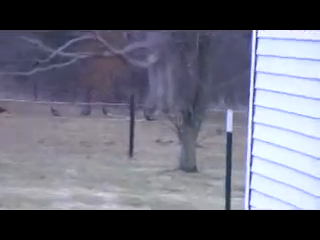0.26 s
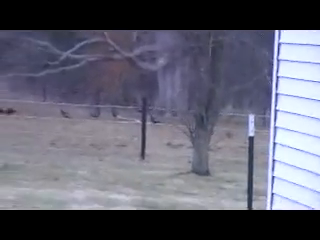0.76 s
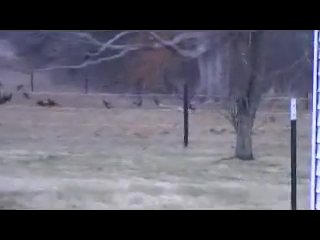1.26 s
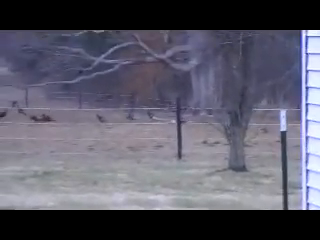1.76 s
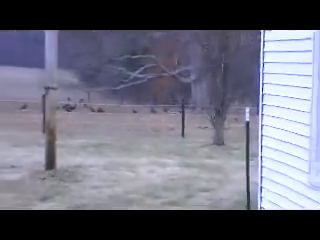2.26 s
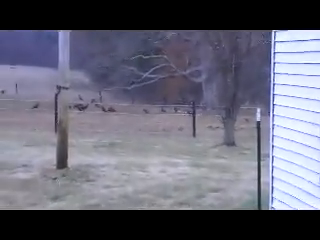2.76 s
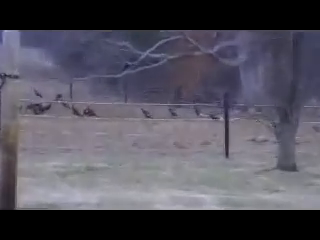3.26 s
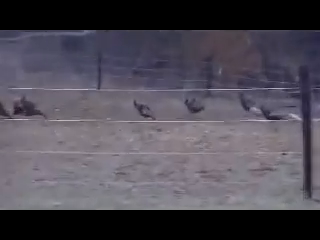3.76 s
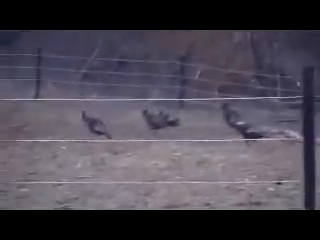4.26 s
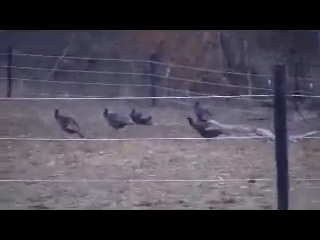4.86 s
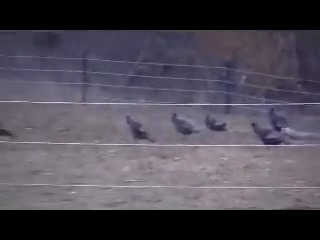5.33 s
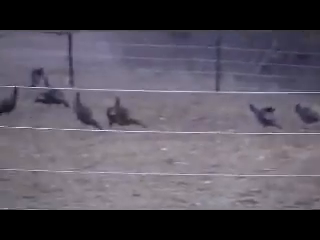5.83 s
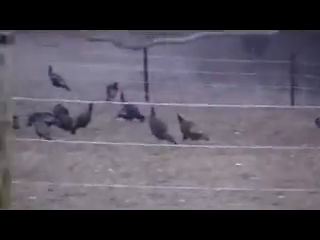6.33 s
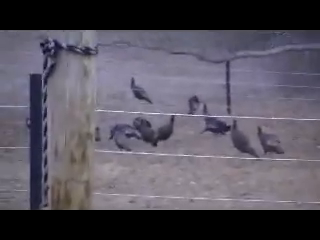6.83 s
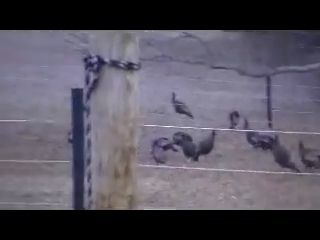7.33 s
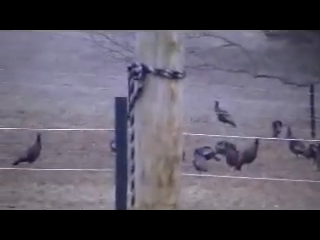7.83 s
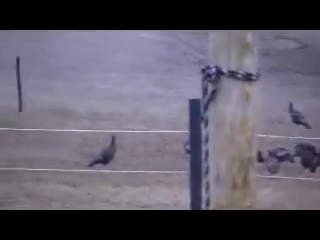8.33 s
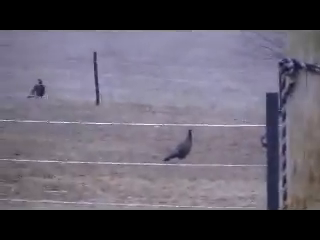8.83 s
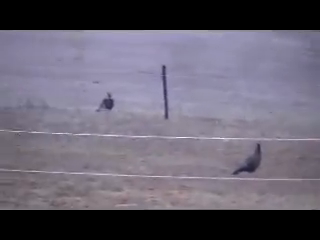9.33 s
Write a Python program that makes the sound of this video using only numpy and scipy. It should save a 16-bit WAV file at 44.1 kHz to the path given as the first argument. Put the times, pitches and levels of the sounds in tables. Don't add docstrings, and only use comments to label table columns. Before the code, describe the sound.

Outdoors at a field edge, a handheld camera is rubbed and knocked, a loose part chattering briefly. Short whistled turkey notes begin, then four spaced hoarse yelps opened by falling chirps. Tiny zoom ticks and a sharp click follow, then several birds yelp and whistle over each other. Finally a farther bird yelps steadily. Hiss, thin whine and distant machine hum lie underneath, the casing noises very close to the microphone.

```python
import sys
import numpy as np
from scipy import signal
from scipy.fft import rfft, irfft, next_fast_len
from scipy.io import wavfile
from scipy.ndimage import uniform_filter1d, map_coordinates

SR = 44100
rng = np.random.default_rng(int(sys.argv[2]) if len(sys.argv) > 2 else 0)


def unload_wav(signal):
    wavfile.write(
        sys.argv[1],
        SR,
        np.round(np.clip(np.atleast_2d(signal).T, -1, 1) * 32767).astype(np.int16),
    )


def boost_factor(decibels):
    exponent = np.asarray(decibels, float) / 20
    return 10 ** exponent


N = 422919
ONSET_S = 0.005


def unit(x):
    return x / np.sqrt(np.mean(x ** 2) + 1e-20)


def along(points, hz):
    f, v = np.transpose(points)
    return np.interp(np.log(hz + 1), np.log(f + 1), v)


def curves(rows, t):
    s, *cols = np.transpose(rows)
    return [np.interp(t, s, c) for c in cols]


def wobble(rate, size=N):
    knots = rng.standard_normal(int(size * rate / SR) + 4)
    return map_coordinates(knots, [np.arange(size) * rate / SR])


def filtered(x, response):
    m = next_fast_len(x.shape[-1] + 8192)
    return irfft(rfft(x, m) * response(np.fft.rfftfreq(m, 1 / SR)), m)[..., :x.shape[-1]]


def modes(table):
    return lambda f: sum((-1) ** k * boost_factor(db) * 1j * f * w / (c * c - f * f + 1j * f * w)
                         for k, (c, w, db) in enumerate(table))


def span(start, length, release=ONSET_S):
    i = np.arange(round(start * SR), round((start + length) * SR))
    edges = np.minimum((i - i[0]) / ONSET_S, (i[-1] - i) / release) / SR
    return i, (i - i[0]) / len(i), np.clip(edges, 0, 1)


def swells(rows, edge):
    t = np.arange(N) / SR
    return sum(boost_factor(db) * np.clip(np.minimum(t - s, s + length - t) / (edge * length), 0, 1)
               for s, length, db in rows)


def flock():
    # start t/s, length t/s, first f/Hz, last f/Hz, level/dB
    settling = [
        (1.635, 0.061, 1510, 1346, -41.5),
        (5.772, 0.052, 1420, 1290, -32.5),
        (6.777, 0.035, 1580, 1220, -33.5),
        (7.585, 0.067, 1480, 1320, -43),
        (7.75, 0.042, 1630, 1286, -43),
    ]
    steady = [(1.318, 0.045, 1374, 1360, -56.5), (5.762, .02, 1506, 1416, -42),
              (1.75, 0.044, 1352, 1355, -50.5), (4.52, .018, 1270, 1230, -51.5),
              (4.535, .025, 1410, 1410, -58), (5.605, 0.02, 1080, 1190, -51),
              (5.622, 0.023, 1300, 1430, -51), (7.648, .016, 1500, 1720, -56),
              (5.285, .014, 1130, 1030, -47), (6.42, 0.016, 1270, 1268, -41.5),
              (6.43, 0.044, 1407, 1440, -50), (6.448, 0.025, 1265, 1270, -45.5),
              (6.828, 0.034, 1236, 1270, -44), (7.792, 0.042, 1437, 1470, -49),
              (7.92, 0.014, 1450, 1450, -51), (7.935, 0.018, 1330, 1330, -55),
              (7.972, 0.02, 1616, 1560, -52.5)]
    long_rise = [
        (5.805, 0.142, 1277, 1357, -38.5),
    ]
    pips = [(1.413, .055, 2132, 2204, -55.5), (1.69, .014, 1330, 1130, -54), (1.742, .012, 1180, 1350, -55),
            (2.102, .02, 2300, 2500, -59), (1.478, .016, 1520, 1480, -57), (1.62, .018, 1920, 1850, -54),
            (1.975, 0.02, 1800, 1800, -50), (2.008, .015, 1510, 1500, -41), (4.492, .022, 1500, 1500, -52),
            (5.607, 0.016, 2150, 2260, -54), (5.648, 0.018, 1700, 1720, -61),
            (5.745, 0.02, 1800, 1730, -49), (5.82, 0.089, 2300, 2320, -58.5),
            (6.082, 0.032, 1900, 1920, -49.5), (6.089, 0.028, 950, 980, -43.5),
            (6.245, .017, 1380, 1370, -47.5), (6.405, 0.037, 936.4, 1010, -44.5),
            (7.75, 0.056, 2190, 1830, -54.5)]
    husky = [
        (4.863, 0.04, 1350, 1330, -39.5),
        (5.179, 0.039, 1600, 1300, -38),
        (5.435, 0.05, 1500, 1290, -49),
        (5.47, 0.049, 1430, 1300, -38),
        (5.515, 0.081, 1250, 1180, -42.5),
        (6.113, 0.043, 1300, 1250, -33),
        (6.102, 0.014, 1700, 1400, -48),
        (5.55, .055, 1020, 1000, -46),
        (7.6, .025, 1080, 950, -46),
        (6.152, 0.057, 1290, 1360, -44),
    ]
    squeaks = [(1.331, .041, 2690, 2610, -65), (1.375, .034, 2480, 2250, -62),
               (5.501, .046, 2440, 2500, -59), (6.106, .025, 2410, 2290, -55),
               (6.111, .033, 2670, 2520, -54), (6.151, .061, 2470, 2510, -58),
               (7.755, .027, 2960, 2840, -68), (5.478, .014, 2780, 2720, -61),
               (6.415, .03, 4220, 4120, -67), (6.41, .025, 1900, 1950, -55), (7.24, .022, 2200, 2000, -59),
               (6.1, .05, 4000, 4200, -69), (5.78, .025, 4150, 4050, -65), (7.092, .012, 2330, 2250, -50)]
    middle = [
        (1.375, 0.037, 1140, 1100, -60),
        (1.413, 0.059, 1067, 1090, -55),
        (1.7, 0.052, 1114, 1170, -51.5),
    ]
    split = [
        (4.55, .103, 1180, 1110, -51),
        (5.21, 0.071, 1160, 1260, -46.5),
    ]
    low = [
        (2.007, .1, 925, 1020, -47.5),
    ]
    low_husky = [
        (5.547, 0.063, 939, 1025, -50),
        (6.145, 0.098, 935, 1034, -45.5),
    ]
    # multiple of the pitch, level/dB at the start, level/dB at the end
    swelling = [(1, -8, -1), (2, -30, -33)]
    plain = [(1, 3.5, 3), (2, -23, -26)]
    mellowing = [(1, -9, -7), (2, -17, -27)]
    thin = [(0.99, 0, -4)]
    waning = [(1, -2, -4.5), (2, -30, -29)]
    reedy = [(1, -1, -2), (2, -9, -12), (3, -27, -30)]
    halving = [(1, -3, 2), (3 / 2, -2, -18), (2, -13, -26)]
    rich = [(1, -6, -8), (2, 1, -2), (3, -13, -15), (4, -16, -27)]
    muffled = [(1, -3, -6), (2, 0, -1), (3, -10, -15), (4, -20, -29)]
    clear = whistles(settling, swelling, bend=-4.5, flutter_db=2.0, waver=0.004)
    clear += whistles(steady, plain, bend=0.3, flutter_db=-1.5, waver=0.0021)
    clear += whistles(long_rise, mellowing, bend=0.42, flutter_db=0.5, waver=0.0026)
    clear += whistles(pips, thin, bend=-0.3, flutter_db=2.5, waver=0.0047)
    clear += whistles(husky, waning, bend=-1.02, flutter_db=1.5, waver=0.032)
    clear += whistles(squeaks, thin, bend=0.3, flutter_db=5, waver=0.04)
    clear += whistles(middle, reedy, bend=2.5, flutter_db=1.5, waver=0.0044)
    clear += whistles(split, halving, bend=1.5, flutter_db=1.5, waver=0.005)
    clear += whistles(low, rich, bend=2.8, flutter_db=1.5, waver=0.007)
    clear += whistles(low_husky, muffled, bend=2.8, flutter_db=2.0, waver=0.016)

    # start t/s, length t/s, level/dB, upper throat relative level/dB
    near = [
        (2.358, 0.1, -40.5, -17),
        (2.708, 0.093, -40.5, -16),
        (3.07, 0.098, -40.5, -15),
        (3.403, 0.098, -43, -25),
        (6.485, .1, -40, -16),
    ]
    rough = [
        (6.805, 0.095, -39.5, -14),
        (7.097, 0.1, -38, -8),
    ]
    under = [
        (4.865, 0.13, -53.5, -9.5),
        (5.18, 0.041, -49.5, -10),
        (5.28, 0.044, -51.5, -30),
        (5.475, .14, -47, -13),
        (5.776, 0.12, -46, -14),
        (6.1, 0.062, -45.5, -15),
        (6.145, 0.088, -48, -9),
        (6.412, 0.069, -47, -14.5),
        (6.785, 0.034, -50, -12),
    ]
    far = [
        (7.235, .1, -50.5, -16),
        (7.572, 0.097, -49.5, -20),
        (7.925, 0.072, -51, -17),
        (8.305, .095, -49, -17),
        (8.68, 0.1, -49.5, -16),
        (9.045, 0.098, -49, -19),
        (9.41, 0.1, -48.5, -16),
    ]
    # f/Hz, width f/Hz, level/dB
    throat = [(835, 270, -3), (1190, 300, 1.5), (1500, 294, 6.5), (1800, 220, 3.5), (2120, 330, -6)]
    rough_throat = [(925, 200, -4), (1160, 290, 1), (1400, 280, 3.5), (1670, 240, 2), (2190, 400, -9)]
    low_throat = [(935, 560, -2.5), (1260, 505, 5), (1580, 405, 2)]
    far_throat = [(1480, 250, 12.3), (2150, 440, 6), (2600, 310, 2.9)]
    hoarse = rasps(near, throat, pulse_hz=298, jitter=0.025, breathy=0.27)
    hoarse += rasps(rough, rough_throat, pulse_hz=283.3, jitter=0.03, breathy=0.61)
    hoarse += boost_factor(4.0) * rasps(under, low_throat, pulse_hz=313.4, jitter=0.06, breathy=0.99)
    hoarse += rasps(far, far_throat, pulse_hz=302.0, jitter=0.0492, breathy=0.68, upper_hz=2840)
    return clear + chirps() + hoarse


def whistles(notes, partials, bend, flutter_db, waver):
    out = np.zeros(N)
    for s, length, first_hz, last_hz, db in notes:
        i, u, gate = span(s, length)
        hz = first_hz + (last_hz - first_hz) * np.expm1(bend * u) / np.expm1(bend)
        phase = 2 * np.pi * np.cumsum(hz * (1 + waver * wobble(146.5, size=len(i)))) / SR
        for k, first_db, last_db in partials:
            flutter = flutter_db * wobble(107.5, size=len(i))
            level_db = db + first_db + (last_db - first_db) * u + flutter
            out[i] += gate * np.sqrt(2) * boost_factor(level_db) * np.sin(k * phase)
    return out


def chirps():
    # t/s, peak level/dB, length t/s
    falls = [
        (1.993, -39, 0.017),
        (2.348, -38, 0.016),
        (2.692, -37, 0.021),
        (3.058, -36.5, 0.013),
        (3.392, -37.5, 0.018),
        (6.4715, -34.5, 0.018),
        (7.085, -35, 0.017),
    ]
    overtone_db = -19
    out = np.zeros(N)
    for s, db, length in falls:
        u = np.arange(int(length * SR)) / (length * SR)
        phase = 2 * np.pi * np.cumsum(1500 - 480 * u ** 1.35) / SR
        envelope = np.sin(np.pi * u ** 1.16) ** 0.29
        tone = np.sin(phase) + boost_factor(overtone_db) * u * np.sin(2 * phase)
        out[round(s * SR):][:len(u)] += boost_factor(db) * envelope * tone
    return out


def rasps(calls, throat, pulse_hz, jitter, breathy, upper_hz=4400):
    # f/Hz, width f/Hz, level/dB
    upper_throat = [(2500, 420, 3), (3470, 630, -2.5), (4050, 460, -6)]
    release_s, sag_db = 0.016, -4
    dulling_db, dulling_s = -7, 0.021
    lumps_db, lumps_per_s = 1.1, 90
    neck_shift = 0.07
    out = np.zeros(N)
    for s, length, db, upper_db in calls:
        i, u, gate = span(s, length, release_s)
        unsteady = jitter * wobble(120, size=len(i)) + 0.03 * wobble(8, size=len(i))
        cycle = np.cumsum(pulse_hz * (1 + unsteady)) / SR
        pulses = np.diff(np.floor(cycle), prepend=0) * boost_factor(1.34 * wobble(263, size=len(i)))
        puffs = rng.standard_normal(len(i)) * np.exp(-1.5 * (cycle % 1))
        source = np.sqrt(1 - breathy) * unit(pulses) + np.sqrt(breathy) * unit(puffs)

        turns = np.cumsum(rng.random(size=100))

        def path(f):
            delays = np.exp(-4j * np.interp(f / 220, range(len(turns)), turns))
            return delays / (1 - 1j * 700 / (f + 1)) ** 3

        def upper_response(f):
            low_cut = (1 - 1j * 1900 / (f + 1)) ** 3
            return path(f) * modes(upper_throat)(f) / low_cut / np.sqrt(1 + (f / upper_hz) ** 10)

        ends = [filtered(source, lambda f: path(f) * modes(throat)(f * k) / (1 + 1j * f / 2200) ** 3)
                for k in 1 + neck_shift * rng.uniform(-1.04, 1, size=2)]
        lower = unit((1 - u) * ends[0] + u * ends[1])
        upper = unit(filtered(source, upper_response))
        level_db = db + sag_db * u + lumps_db * wobble(lumps_per_s, size=len(i))
        dulling = dulling_db * (1 - np.exp(-u * length / dulling_s))
        upper_level_db = upper_db + lumps_db * wobble(lumps_per_s, size=len(i)) + dulling
        out[i] += gate * boost_factor(level_db) * (lower + boost_factor(upper_level_db) * upper)
    return out


def echo(x):
    # f/Hz, time to fall 60 dB t/s
    field = [(500, 0.35), (1500, 0.73), (5000, 0.34)]
    hz, t, z = signal.stft(rng.standard_normal((2, SR // 2)), SR, nperseg=256)
    decay = boost_factor(-60 * t / along(field, hz)[:, None])
    tail = signal.istft(z * decay, SR, nperseg=256)[1]
    return signal.fftconvolve(x[None], tail / np.linalg.norm(tail[0]), axes=1)[:, :N]


def camera():
    return hiss() + whine() + rub() + knock() + clicks() + zoom()


def rub():
    # start t/s, length t/s, level/dB
    strokes = [
        (-.05, 0.2, -66),
        (.33, 0.34, -59.5),
        (.722, 0.057, -48.5),
        (.77, 0.099, -52.5),
        (9.02, 0.17, -67),
    ]
    # f/Hz, density level/dB
    skin = [(800, -60), (1500, -2), (3000, 6.5), (5000, 0), (9000, -2), (11000, -7), (12500, -22)]
    grain = rng.standard_normal(N) * boost_factor(1.3 * wobble(200) + 0.88 * wobble(68.3))
    return swells(strokes, edge=0.33) * unit(filtered(grain, lambda f: boost_factor(along(skin, f))))


def knock():
    # t/s, peak level/dB, thump relative level/dB
    blows = [
        (.003, -38, 7.5),
        (0.726, -35, 3),
        (0.7286, -27, 4),
        (.7335, -25.5, -9),
        (0.738, -22, -8),
        (0.745, -39, 1),
        (0.75, -39, -8),
        (0.756, -40, 2),
    ]
    # f/Hz, width f/Hz, level/dB
    casing = [(606, 330, -1.5), (796, 260, 3), (1170, 83, 7.5), (1700, 170, 4), (2300, 500, -7.5),
              (2840, 440, -9.5), (4700, 630, -15.5), (6000, 390, -11)]
    thump = [(208, 104, 2.5), (456, 94, -0.5)]
    # starts 0.7775 s, every 7.5 ms, 1 dB weaker each time
    rattle = [(0.7775 + k * 0.0075, -40.5 - k, 5.5) for k in range(8)]
    s, db, low_db = np.transpose(blows + rattle)
    ring = boost_factor(11.0) * bursts(s, db, t60=0.028, snap=5.2, response=modes(casing))
    return ring + boost_factor(13.0) * bursts(s, db + low_db, t60=0.049, response=modes(thump))


def clicks():
    # t/s, peak level/dB, lower part relative level/dB
    snaps = [(0.0687, -43, -8), (0.4474, -42, -9), (0.8165, -43, 9), (0.8374, -51, 6), (1.755, -50, 3),
             (4.2073, -54, -4), (4.706, -34.5, -12), (4.7142, -53, -6), (4.7495, -47, -10),
             (4.7533, -56, -8), (4.8226, -54, 10), (4.8256, -51.5, 14.5), (4.934, -64, 14),
             (8.7894, -55, 3)]

    def bright(f):
        return modes([(7500, 3500, 0), (10200, 3000, -4)])(f) ** 2 / (1 + 1j * (f / 12000) ** 9)

    def lower(f):
        return modes([(2600, 2600, -3)])(f) / (1 + 1j * (f / 10500) ** 7)

    s, db, low_db = np.transpose(snaps)
    out = boost_factor(5.0) * bursts(s, db, t60=0.004, snap=4.5, response=bright)
    return out + boost_factor(7.0) * bursts(s, db + low_db, t60=0.004, snap=4.5, response=lower)


def zoom():
    # t/s, peak level/dB
    ticks = [(3.0341, -54), (3.0864, -55), (3.3094, -57), (3.3995, -55), (3.4875, -55), (3.5853, -55),
             (3.6282, -54), (3.7249, -54), (3.773, -51), (3.8344, -52), (3.8794, -54), (4.0407, -53),
             (4.0594, -65)]
    # f/Hz, width f/Hz, level/dB
    gear = [(3430, 220, 6.5), (5950, 430, 2), (9150, 2500, -4)]
    return boost_factor(2.0) * bursts(*np.transpose(ticks), t60=0.07, response=modes(gear))


def bursts(times, levels_db, t60, response, snap=1.01):
    x, t = np.zeros(N), np.arange(SR // 20) / SR
    for s, db in zip(times, levels_db):
        noise = rng.standard_normal(len(t))
        noise[0] = -snap
        x[round(s * SR):][:len(t)] += boost_factor(db - 60 * t / t60) * noise
    return filtered(x, response)


def whine():
    # f/Hz, level/dB
    tones = [(2186, -68), (4371, -84), (5959, -84), (6331, -88), (6557, -82), (8742, -91), (10971, -96)]
    t = np.arange(N) / SR
    return sum(np.sqrt(2) * boost_factor(db + wobble(2.7)) * np.sin(2 * np.pi * hz * t + 0.3 * wobble(5.8))
               for hz, db in tones)


def hiss():
    # f/Hz, density level/dB
    common = [(1800, -13), (3000, -1.5), (4300, -0.5), (8400, -6), (10500, -9.5), (11800, -16.5),
              (12300, -21), (13700, -22)]
    # f/Hz, level/dB under the common hiss
    differing = [(3000, -14), (5000, -58), (8000, -15), (12000, -17)]
    noise = rng.standard_normal((2, N))
    colour = lambda f: boost_factor(along(common, f) + [0 * f, along(differing, f)])
    mid, side = np.sqrt(2) * unit(filtered(noise, colour))
    return boost_factor(-71.0) * (mid + side * [[1], [-1]])


def distance():
    return far_rush() + drones()


def far_rush():
    # f/Hz, density level/dB
    rumble = [(15, -75), (25, -36), (40, -34), (48, -12), (101, -5.5), (176, -10.5), (231, -13.5),
              (259, -12), (291, -11.5), (383, -15), (592, -14), (1120, -16.5), (1780, -20.5), (2690, -30.5),
              (6000, -53.5), (7800, -117), (13200, -120)]
    # f/Hz, correlation
    alike = [(60, 1), (150, 0.81), (360, 0.66), (890, 0.77), (2180, 0.3), (5350, 0.16), (13100, 0.34)]
    # f/Hz, width f/Hz, level/dB
    yard = [(548, 61, -0.5), (814, 11.3, 3)]
    t = np.arange(N) / SR
    z = signal.stft(rng.standard_normal((2, N)), nperseg=512)[2]
    patches = uniform_filter1d(uniform_filter1d(rng.standard_normal(z.shape[1:]), 5, 0), 14, 1)
    pair = signal.istft(z * boost_factor(0.64 * unit(patches)), nperseg=512)[1][:, :N]

    def colour(f):
        turn = np.arccos(np.clip(along(alike, f), -1, 1)) / 2
        resonance = 1 + sum(abs(modes([m])(f)) for m in yard)
        return boost_factor(along(rumble, f)) * resonance * [np.cos(turn), np.sin(turn)]

    mid, side = filtered(pair, colour)
    return boost_factor(-45 + 0.05 * t) * unit(np.array([mid + side, mid - side]))


def drones():
    # t/s, f/Hz, level/dB
    engine = [
        (0, 96.5, -56),
        (1.7, 97.5, -52),
        (3.8, 101.4, -47.5),
        (5.7, 101.9, -45.5),
        (9.59, 101.9, -52),
    ]
    # first f/Hz, drift Hz per s, loudest t/s, peak level/dB, loss dB per s away from it
    machines = [
        (66.9, -.42, 3.8, -51.5, 1.35),
        (148, -0.28, 4.9, -55, 1.2),
        (238.8, -.6, 5.6, -58, 0.37),
    ]
    # start t/s, length t/s, level/dB
    pump = [
        (.14, 0.475, -51.5),
        (.68, 0.061, -49),
        (.76, 0.37, -56.5),
        (2.2, .45, -63),
        (3.1, 0.32, -52.5),
        (3.45, .15, -54),
        (5.695, 0.055, -53),
        (6.345, .03, -55),
    ]
    pump_hz = 575
    t = np.arange(N) / SR
    hz, db = curves(engine, t)
    hums = [(hz, boost_factor(db)), (pump_hz + 0 * t, swells(pump, edge=0.024))]
    for hz, drift, s, db, loss in machines:
        hums.append((hz + drift * t, boost_factor(db - loss * abs(t - s))))
    out = np.zeros((2, N))
    for hz, gain in hums:
        phase = 2 * np.pi * np.cumsum(hz) / SR + 0.5 * wobble(7)
        lean = 0.12 * wobble(5.1) * [[1], [-1]]
        out += gain * np.sqrt(2) * boost_factor(0.7 * wobble(14)) * np.sin(phase + lean)
    return out


def scene():
    birds = flock()
    return boost_factor(3.0) * birds + boost_factor(-11.0) * echo(birds) + camera() + distance()


def band_limit(x):
    return signal.sosfilt(signal.butter(12, 13730, fs=SR, output="sos"), x)


def record(dry):
    mix = filtered(dry, lambda f: 1 / np.sqrt(1 + (f / 13600) ** 24))
    return band_limit(mix)


dry = scene()
out = record(dry)
unload_wav(out)
```